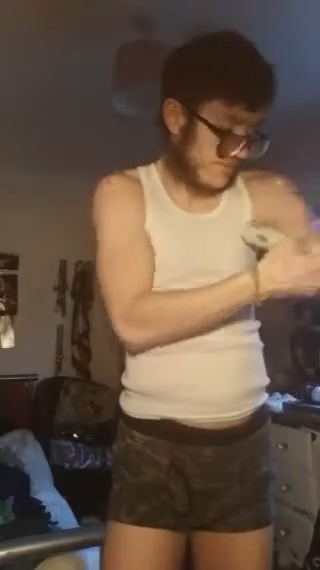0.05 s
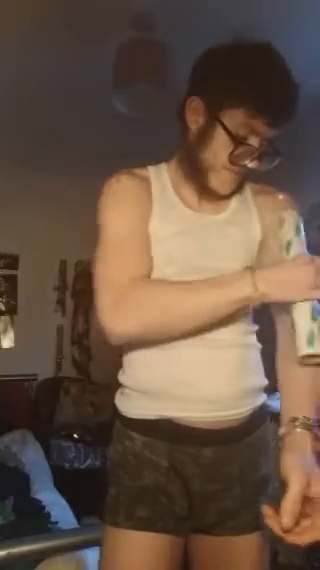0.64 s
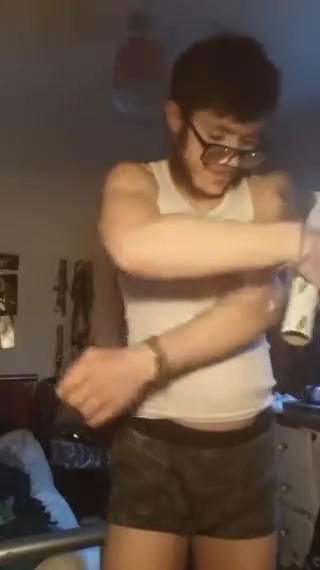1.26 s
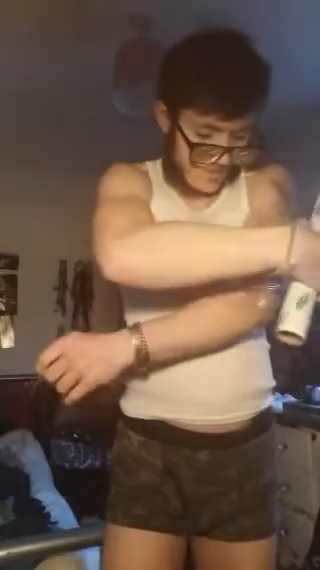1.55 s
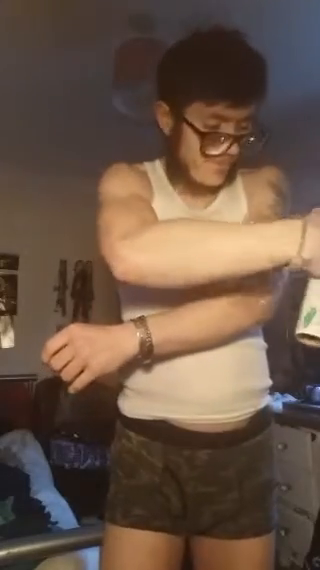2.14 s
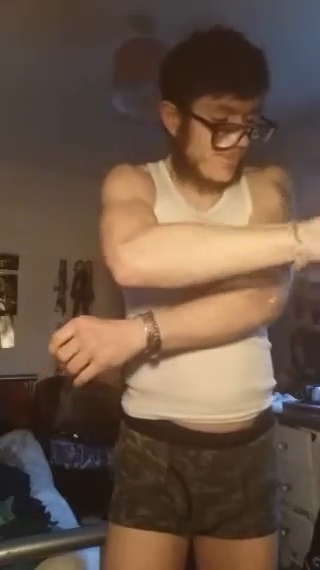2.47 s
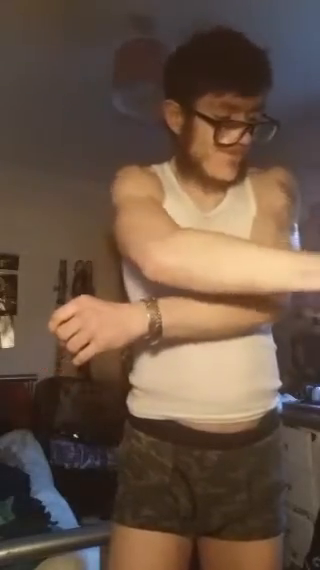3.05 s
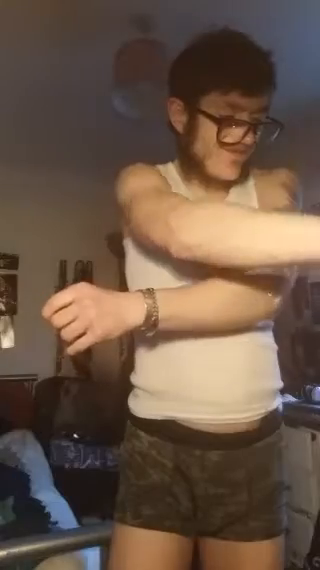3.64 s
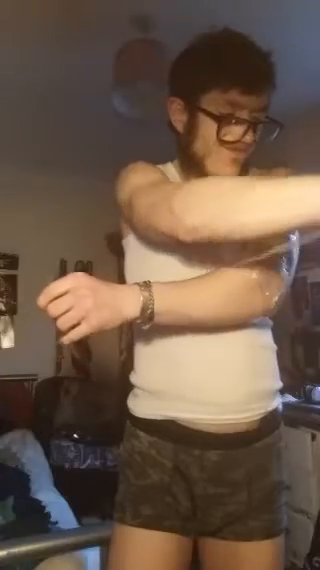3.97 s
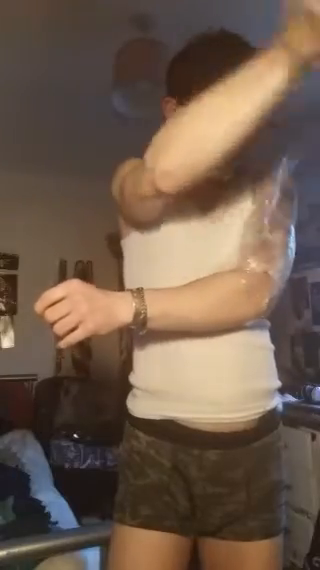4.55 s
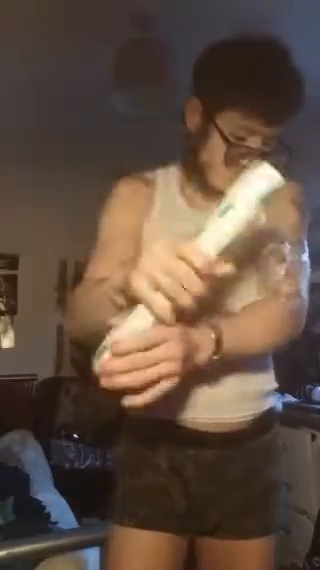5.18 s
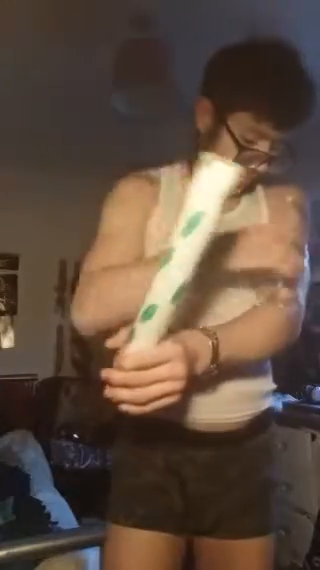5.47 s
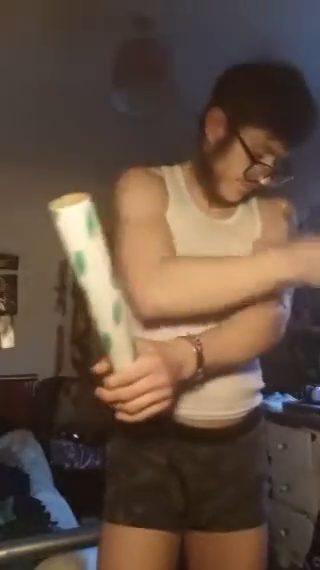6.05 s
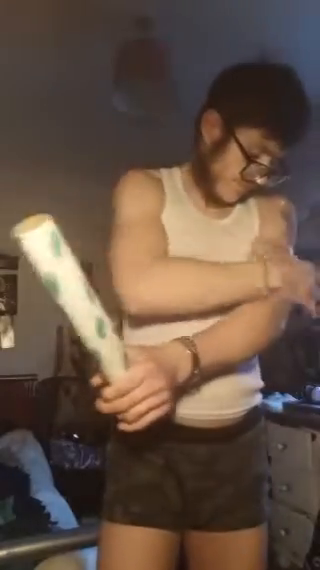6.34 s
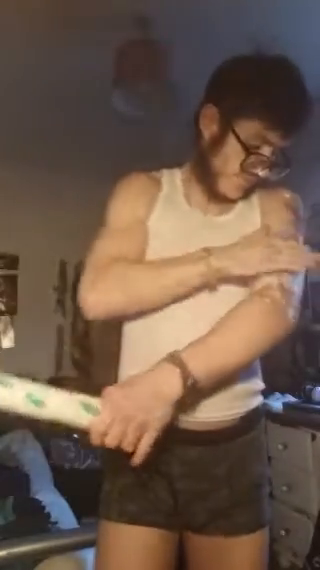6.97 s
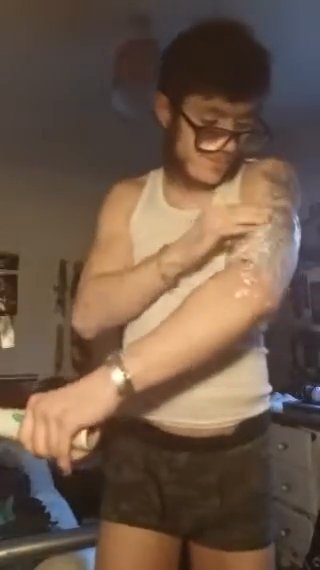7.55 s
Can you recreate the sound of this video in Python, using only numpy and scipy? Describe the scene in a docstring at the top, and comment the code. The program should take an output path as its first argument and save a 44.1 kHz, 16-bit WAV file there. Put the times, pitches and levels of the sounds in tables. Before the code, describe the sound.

Cling film peels off a cardboard roll and crinkles unevenly as it is wound around an arm, with small snaps, squeaks and light clinks of metal wrist jewellery. Partway through, the film rips once, loudly, with a soft puff of air. The crackling swells and eases, the roll bumps dully, and a palm smooths the film with two soft pats. It sounds close, in a small room with a faint hum.

```python
"""Cling film is wound round an arm in a small bedroom. First it peels off its cardboard roll by stick-slip
while metal wrist jewellery clinks and pings. As it goes on, its creases buckle in a steady crinkle, it
snaps and squeaks, and the roll rubs and bumps. At 3.2 s the taut film falls still, then rips once, loudly,
with a waft of air. The winding swells and eases, the jewellery rings again, and from about 6.4 s a palm
smooths the film down, with a dull tap and two soft pats. Short echoes and a faint hum lie under it all."""
import sys
import numpy as np
from scipy import signal
from scipy.fft import rfft, irfft
from scipy.io import wavfile
from scipy.ndimage import uniform_filter1d

SR = 44100
rng = np.random.default_rng(int(sys.argv[2]) if len(sys.argv) > 2 else 0)


def inscribe(sig):
    """Save sig as 16-bit PCM at rate SR to the path in sys.argv[1].

    A 1-D sig is mono; a 2-D sig holds one channel per row.
    Samples are clipped to [-1, 1] before scaling.
    """
    pcm = np.round(np.clip(np.atleast_2d(sig).T, -1, 1) * 32767)
    wavfile.write(sys.argv[1], SR, pcm.astype(np.int16))


N = 344421
TIME = np.arange(N) / SR
SILENT_DB = -120.
TEN_MS_GAIN = np.sqrt(SR / 100)   # gives a unit-energy sound the energy of 10 ms at unit rms


# radiation spectra of the film's crackle, treble fizz and low body: frequency_hz, relative_db
CRACKLE_SPECTRUM = [(300, -40.5), (900, -8.5), (1250, -14), (1600, -4), (2600, -2), (4000, -2), (5900, -3),
                    (6600, -10.5), (7600, -24.5), (12000, -51.5)]
FIZZ_SPECTRUM = [(3000, -35), (6500, -1.5), (8000, -8), (10000, -4), (13000, -3), (15200, 1), (16500, 0)]
BODY_SPECTRUM = [(30, -36.5), (80, -26.5), (160, -4.5), (270, -5.5), (500, -3), (660, -3), (920, 2.5),
                 (1200, -4), (1700, -9), (4000, -58)]
def crinkle(level_db, creases_per_s, patch_count=10):
    """Buckling: creases flip, each ringing a patch of its own size over sliding hiss; (crackle, fizz)."""
    creases = evened(clicks(creases_per_s, spread_db=7), 0.082)
    patch = rng.integers(0, patch_count, N)
    ringing = sum(resonate(creases * (patch == k), hz, .45 * hz) / np.sqrt(hz)
                  for k, hz in enumerate(np.geomspace(1100, 7500, patch_count)))
    hiss = from_db(-7) * rng.standard_normal(N)
    crackle = rms_one(evened(ringing, 0.054) + hiss) * from_db(level_db - 6)
    fizz_db = -58 + .85 * (level_db + 50)   # grows more slowly: loud movements use broader, duller patches
    fizz = rms_one(creases + hiss) * from_db(fizz_db)
    return colour(crackle, CRACKLE_SPECTRUM), colour(fizz, FIZZ_SPECTRUM)


# steady crinkling, rising with the tension of the film: time_s, level_db
WINDING_LEVELS = [(0.0, -51.5), (0.14, -54), (0.28, -55), (0.41, -65), (0.62, -65), (1.29, -64),
                  (1.55, -67), (2.43, -68.5), (2.5, -64.5), (2.81, -58.5), (2.93, -55), (3.16, -51.5),
                  (3.38, -52.5), (3.8, -50.5), (4.11, -47), (4.23, -46.5), (4.59, -56.5), (4.75, -67.5),
                  (5.51, -67), (5.65, -57.5), (5.77, -56), (5.82, -51.5), (5.96, -70), (6.2, -77)]
# dull rubbing of roll and film on the arm: time_s, level_db
RUB_LEVELS = [(0.0, -61.5), (0.26, -53.5), (0.41, -70), (1.09, -68.5), (1.23, -65.5), (1.8, -65.5),
              (1.95, -70.5), (2.81, -72), (3.19, -70.5), (3.87, -60), (4.23, -55.5), (4.56, -62.5),
              (4.66, -70.5), (5.56, -73.5), (5.75, -68), (6.2, -74)]
# spectrum of that rubbing: frequency_hz, relative_db
RUB_SPECTRUM = [(50, -26), (150, -15.5), (320, 5), (520, 1), (720, -0.5), (950, -1.5), (1250, -7.5),
                (2000, -18.5), (5000, -51)]
RIP_S = 3.213
def winding(creases_per_s=1300, clumps_per_s=45, ticks_per_s=50, still_s=.05):
    """Buckling and friction: the film crinkles in clumps, ticks and rubs as it goes on under tension."""
    clumps = np.interp(TIME * clumps_per_s, np.arange(N), rng.standard_normal(N))
    still = (TIME > RIP_S - still_s) & (TIME < RIP_S)   # the taut film holds just before it tears
    level_db = in_time(WINDING_LEVELS) - 2 + 2.5 * clumps - 12 * still
    crackle, fizz = crinkle(level_db, creases_per_s)
    impulses = clicks(ticks_per_s, spread_db=0.7) * from_db(level_db + 2)
    ticks = colour(impulses, CRACKLE_SPECTRUM) + from_db(4) * colour(impulses, FIZZ_SPECTRUM)
    rub = friction(in_time(RUB_LEVELS), creases_per_s, RUB_SPECTRUM)
    return crackle + fizz + rub + ticks


def rip(length_s=0.03, decay_db_per_s=400, creases_per_s=4000):
    """Fracture: a tear crosses the sheet as a dense avalanche of creases, then dies away."""
    level_db = -23 - decay_db_per_s * np.clip(TIME - RIP_S - length_s, 0, 1)
    level_db = np.where(TIME < RIP_S, SILENT_DB, level_db)
    crackle, fizz = crinkle(level_db, creases_per_s)
    return crackle + from_db(-7) * fizz + friction(level_db - 8.5, creases_per_s, BODY_SPECTRUM)


# snaps of the film, plus a dull tap (6.63 s) and two soft pats (7.0 and 7.31 s):
# start_s, level_db, relative_body_db, relative_fizz_db, duration_s
SNAPS_AND_PATS = [(0.17, -46, -8, -21, 0.0026), (0.185, -38.5, -17, -13.5, 0.0025),
                  (0.234, -45, -6, -9, 0.0029), (.246, -47.5, -16, -3, .0014),
                  (0.27, -42, -33, -6.5, 0.00095), (.281, -38.5, -17, -8.5, .0055),
                  (0.375, -47, -14, -7, 0.0034), (0.399, -39, -27.5, -13, 0.0015),
                  (0.406, -43.5, -30, -10, 0.00097), (.579, -48.5, -9, -12, 0.0012),
                  (.585, -42, -16, -4.5, .006), (1.77, -46, -14, -14, 0.0031), (1.888, -51, -9, -5, 0.0031),
                  (2.447, -50.5, -4.5, -7, 0.0025), (2.503, -56, -10, -6.5, 0.0012),
                  (2.58, -56, -12, -5, 0.0024), (2.822, -52.5, -11, -9, 0.0015),
                  (3.2102, -20, -4, -19, .0014), (3.2161, -21, -16, -24, 0.00073),
                  (3.2179, -22.5, -10, -21, 0.0013), (3.39, -51, -5.5, -7, 0.0015),
                  (3.422, -49, -18, -18, 0.0013), (3.459, -50, -8.5, -6.5, 0.0013),
                  (3.549, -46, -9, -7, .0018), (3.554, -40.5, -9.5, -18, .0014),
                  (3.672, -39, -5.5, -7.5, 0.0045), (3.817, -45.5, -14, -16, 0.009),
                  (3.888, -45, -8, -4.5, 0.0017), (4.067, -44.5, -11, -15, .0055),
                  (4.133, -32, -7.5, -30, 0.00089), (4.273, -45, -6, -37, 0.0027),
                  (4.316, -46.5, -1, -10, 0.0019), (4.361, -32.5, -6, -9, .0024),
                  (4.509, -55, -11, -4.5, 0.0015), (4.639, -29.5, -6, -12.5, .0029),
                  (5.275, -50, -6, -16, 0.0066), (5.666, -37, -6, -12.5, 0.0022),
                  (5.807, -57, -10, -16, 0.0012), (6.631, -64, 11, -20, 0.0021),
                  (7.003, -46.5, -6.5, -15, .0097), (7.31, -39.5, -11.5, -15, 0.0087),
                  (7.632, -66.5, -14, -11, .002)]
def snaps_and_pats(centre_hz=1740, body_db_per_octave=17, size=4096):
    """Impulsive excitation: in each snap, tap or pat, cracks swell round a main one and ring the film."""
    out, t = np.zeros(N), TIME[:size]
    low_cut = signal.butter(2, 420, "high", fs=SR, output="sos")   # a small patch radiates little bass
    for start_s, level_db, body_db, fizz_db, duration_s in SNAPS_AND_PATS:
        rise_s = .55 * duration_s
        ring_hz = centre_hz * 2 ** (-body_db / body_db_per_octave)   # less body, higher ring
        burst = flat_burst(t * np.exp(-t / rise_s), ragged_db=5)
        burst[int(rise_s * SR / 2)] += np.sqrt(0.00095 / duration_s)   # a quick snap is more one crack
        ring = resonate(burst, ring_hz, width_hz=1200)
        crack = unit_energy(colour(burst + ring, CRACKLE_SPECTRUM))
        body = from_db(body_db) * unit_energy(signal.sosfilt(low_cut, colour(burst, BODY_SPECTRUM)))
        fizz = from_db(fizz_db + 4) * unit_energy(colour(burst, FIZZ_SPECTRUM))
        add(out, start_s, from_db(level_db + 1) * TEN_MS_GAIN * (crack + body + fizz))
    return out


# tugs that crumple the film: start_s, length_s, first_db, last_db, relative_body_db
HAND_TUGS = [(.19, 0.14, -40.5, -47, -16), (.32, .1, -58, -50.5, -9), (.587, 0.065, -50, -48, -9.5),
             (.67, 0.05, -54, -53.5, -4), (.845, 0.084, -56, -65, -16), (1.75, 0.16, -61.5, -58, -4),
             (2.05, 0.23, -60.5, -60.5, -12), (2.4, 0.06, -57.5, -53.5, -13),
             (2.96, 0.17, -54.5, -53.5, -13.5), (5.183, 0.048, -50.5, -60, -19),
             (5.61, 0.062, -57.5, -42.5, -10), (5.672, 0.044, -51, -49.5, -13),
             (5.91, 0.022, -41.5, -46.5, -18), (6.668, 0.015, -54, -49.5, -21)]
# slides of film on skin and palm on film: start_s, length_s, first_db, last_db, relative_body_db
HAND_SLIDES = [(1.06, 0.34, -63.5, -62.5, 1.5), (4.133, 0.037, -35.5, -36.5, -1),
               (4.286, 0.019, -42.5, -41.5, 1.5), (6.355, 0.17, -48.5, -55.5, -12),
               (6.525, 0.12, -57, -67, -22.5), (7.025, .05, -58, -60, -14)]
def hands():
    """Forced buckling and sliding friction: tugs crumple; finer-grained slides swish in one resonance."""
    tugs = strokes(HAND_TUGS, attack_s=0.027, creases_per_s=2000, fizz_db=-0.5)
    slides = from_db(-3) * strokes(HAND_SLIDES, attack_s=0.041, creases_per_s=7000, fizz_db=-1.5)
    swish = from_db(-2) * resonate(slides, hz=2750, width_hz=1300)
    return tugs + slides + swish


def strokes(rows, attack_s, creases_per_s, fizz_db, release_s=0.044, fade_db=31.5):
    """Amplitude envelopes: each hand movement swells, runs on and fades; the whole sheet adds body."""
    level_db, body_db = np.full((2, N), SILENT_DB)
    for start_s, length_s, first_db, last_db, relative_body_db in rows:
        corners_s = [start_s - attack_s, start_s, start_s + length_s, start_s + length_s + release_s]
        corners_db = [first_db - fade_db, first_db, last_db, last_db - fade_db]
        during = (TIME > corners_s[0]) & (TIME < corners_s[-1])
        stroke_db = np.interp(TIME[during], corners_s, corners_db)
        level_db[during] = np.maximum(level_db[during], stroke_db)
        body_db[during] = np.maximum(body_db[during], stroke_db + relative_body_db)
    crackle, fizz = crinkle(level_db, creases_per_s)
    return crackle + from_db(fizz_db) * fizz + friction(body_db, creases_per_s, BODY_SPECTRUM)


def friction(level_db, catches_per_s, spectrum):
    """Sliding friction: filtered noise with small catches in it."""
    noise = rng.standard_normal(N)
    catches = from_db(-3) * evened(clicks(catches_per_s, spread_db=6), 0.062)
    return colour(rms_one(noise + catches) * from_db(level_db), spectrum)


# pulls off the roll: start_s, length_s, level_db, pitch_hz, upper_modes_db, slips_per_s
PEEL_PULLS = [(-.04, 0.33, -53, 2080, -13, 900), (0.618, 0.037, -43.5, 1915, -1.5, 900),
              (3.415, 0.089, -50.5, 1910, -4, 150), (3.56, 0.37, -70, 1920, -15, 120)]
# resonances of the taut sheet: pitch_ratio, width_hz, gain_db
SHEET_MODES = [(1.0, 129, 8.5), (1.25, 320, 0), (1.7, 170, 10), (2.05, 220, -28)]
def peeling(edge_s=0.0025):
    """Stick-slip: the film leaves the roll in small slips that pluck the taut sheet."""
    out = np.zeros(N)
    for start_s, length_s, level_db, pitch_hz, upper_db, slips_per_s in PEEL_PULLS:
        during = (TIME >= start_s) & (TIME <= start_s + length_s)
        slips = evened(clicks(slips_per_s, spread_db=4)[during], .015)
        sheet = sum(from_db(gain_db + upper_db * (k > 1)) * resonate(slips, ratio * pitch_hz, width_hz)
                    for k, (ratio, width_hz, gain_db) in enumerate(SHEET_MODES))
        to_edge_s = np.minimum(TIME[during] - start_s, start_s + length_s - TIME[during])
        out[during] += rms_one(sheet) * from_db(level_db) * np.minimum(to_edge_s / edge_s, 1)
    return out


# brief high jewellery pings (near 6.2 kHz) and lower squeaks of film: start_s, level_db, pitch_hz
PINGS_AND_SQUEAKS = [(.8525, -41, 6200), (0.88, -38, 6170), (1.4264, -36, 6300), (1.427, -41, 2820),
                     (1.5613, -38.5, 2820), (1.5772, -34.5, 2950)]
def pings_and_squeaks(fall_per_s=18, rise_s=0.00032, size=1024):
    """Damped oscillation: each ping or squeak is one brief tone whose pitch falls slightly."""
    out, t = np.zeros(N), TIME[:size]
    envelope = t / rise_s * np.exp(1 - t / rise_s)
    for start_s, level_db, pitch_hz in PINGS_AND_SQUEAKS:
        phase = 2 * np.pi * np.cumsum(pitch_hz * np.exp(-fall_per_s * t)) / SR
        add(out, start_s, from_db(level_db) * envelope * np.sin(phase))
    return out


# clinks as the arms swing: start_s, level_db, highest_modes_db
JEWELLERY_CLINKS = [(0.012, -69, -2), (0.031, -55, -4), (0.0547, -46, 11), (0.0876, -47, -9),
                    (4.73, -51, -17), (4.744, -49.5, -18.5), (4.91, -51, -8.5), (4.917, -54, -12),
                    (4.956, -55, 5), (4.969, -48.5, 0.5), (5.208, -46.5, 6), (5.218, -45.5, 12),
                    (5.261, -51, 1), (5.437, -59.5, 8), (5.807, -53.5, 16), (6.348, -56.5, 26)]
# modes of the metal links: frequency_hz, gain_db, t60_s
JEWELLERY_MODES = [(2450, -7, 0.043), (4900, -9, 0.033), (6130, 0.5, 0.038), (7900, -11, .025),
                   (9650, -10.5, 0.071), (10460, -11, 0.04), (12300, -4, 0.041), (13730, -4, 0.036),
                   (14750, -3, .02), (15480, -2, 0.036), (16900, -3, .02)]
def jewellery(scatter_db=6.5, highest_above_hz=14300, tick_s=0.002):
    """Modal ringing: links collide with a tick, exciting their modes in new proportions each time."""
    out, mode_hz = np.zeros(N), np.array(JEWELLERY_MODES)[:, 0]
    for start_s, level_db, highest_db in JEWELLERY_CLINKS:
        gains_db = highest_db * (mode_hz > highest_above_hz)
        gains_db = gains_db + scatter_db * rng.standard_normal(len(mode_hz))
        ring = unit_energy(struck(JEWELLERY_MODES, gains_db))
        contact = rng.standard_normal(len(ring)) * np.exp(-TIME[:len(ring)] / tick_s)
        tick = from_db(-3) * unit_energy(colour(contact, FIZZ_SPECTRUM))
        add(out, start_s, from_db(level_db - 1.5) * TEN_MS_GAIN * (ring + tick))
    return out


# knocks of the roll on hand and arm: start_s, level_db
ROLL_BUMPS = [(2.187, -34.5), (3.064, -52), (3.915, -42), (4.025, -62), (4.292, -47), (7.364, -52)]
# modes of the cardboard roll: frequency_hz, gain_db, t60_s
ROLL_MODES = [(155, -5, .065), (240, -9, .04), (305, 0, .062), (850, -18, .03)]
def bumps(contact_s=0.0046):
    """Soft impact: the yielding contact lets the modes of the cardboard roll swell in."""
    out, knock = np.zeros(N), struck(ROLL_MODES, np.zeros(len(ROLL_MODES)))
    swell = 1 - np.exp(-(TIME[:len(knock)] / contact_s) ** 2)
    for start_s, level_db in ROLL_BUMPS:
        add(out, start_s, from_db(level_db + 2) * knock * swell)
    return out


# air stirred by the swinging arm and flapping film: start_s, level_db, rise_s
AIR_WAFTS = [(3.21, -40, .036), (3.73, -63, 0.099), (4.31, -67, .05), (5.08, -65, .16)]
# spectrum of the moving air: frequency_hz, relative_db
AIR_SPECTRUM = [(15, -48), (35, -24), (56, -3), (72, -9), (100, -16.5), (170, -17), (400, -51.5)]
def wafts():
    """Pressure fluctuation: moving air arrives as a soft, deep flutter that swells and ebbs."""
    gust = np.zeros(N)
    for start_s, level_db, rise_s in AIR_WAFTS:
        age = np.maximum(TIME - start_s, 0) / rise_s
        gust += from_db(level_db) * (age * np.exp(1 - age)) ** 2
    return gust * evened(colour(rng.standard_normal(N), AIR_SPECTRUM), .06)


def echoes(x, early_t60_s=0.06, tail_t60_s=0.17, treble_t60_s=0.16, delay_s=0.0013, build_s=0.0042):
    """Reverberation: quick reflections off body and furniture, then a short diffuse tail."""
    size, hop = 8192, 1024
    t = np.maximum(TIME[:size] - delay_s, 0)
    padded, out = np.pad(x, size), np.zeros(N + 4 * size)
    fade = np.sqrt(signal.get_window("hann", 2 * hop))
    damping = signal.butter(2, 7000, fs=SR, output="sos")
    early_fall, tail_fall, treble_fall = (
        from_db(-60 * t / t60_s) for t60_s in (early_t60_s, tail_t60_s, treble_t60_s))
    for at in range(0, N + size, hop):   # the echo pattern changes as the arms move
        diffuse = rng.standard_normal(size)
        dull = signal.sosfiltfilt(damping, diffuse)   # soft furnishings absorb the treble sooner
        decay = dull * tail_fall + (diffuse - dull) * treble_fall
        tail = unit_energy(decay * (1 - np.exp(-t / build_s)))
        early = flat_burst((t > 0) * early_fall, ragged_db=0, passes=1)
        response = from_db(-7) * early + from_db(-6) * tail
        out[at:at + size + 2 * hop - 1] += signal.fftconvolve(padded[at:at + 2 * hop] * fade, response)
    return out[size:size + N]


# spectrum of the bedroom's background: frequency_hz, relative_db
ROOM_SPECTRUM = [(20, -21), (40, -7), (58, 0), (85, -1.5), (160, -1), (300, -12.5), (600, -19.5),
                 (1200, -18), (3000, -17.5), (6000, -26), (8000, -33), (15000, -29.5)]
def ambience(noise_db=-68, hum_db=-79, hum_hz=59):
    """Noise floor: faint broadband room noise with a low pure-tone hum."""
    hum = from_db(hum_db) * rms_one(np.sin(2 * np.pi * hum_hz * TIME))
    return from_db(noise_db) * colour(rng.standard_normal(N), ROOM_SPECTRUM) + hum


def clicks(per_s, spread_db):
    """Poisson process: random clicks of either sign, most small and a few large."""
    sizes = from_db(spread_db * np.minimum(rng.exponential(1, N), 4)) * rng.choice([-1, 1], N)
    return sizes * (rng.random(N) < per_s / SR)


def flat_burst(envelope, ragged_db, passes=3):
    """Spectral whitening: a swarm of cracks under an envelope, with no frequency favoured."""
    cracks, strength = rng.standard_normal((2, len(envelope)))
    burst = cracks * from_db(ragged_db * strength) * envelope
    gate = np.minimum(2 * envelope / envelope.max(), 1)
    for _ in range(passes):
        spectrum = rfft(burst)
        burst = irfft(spectrum / (np.abs(spectrum) + 1e-20)) * gate
    return unit_energy(burst)


def struck(modes, gains_db, size=6000):
    """Free vibration: one blow leaves a sum of exponentially decaying modes."""
    hz, db, t60_s = np.transpose(modes)[:, :, None]
    t = TIME[:size]
    return np.sum(from_db(db + gains_db[:, None] - 60 * t / t60_s) * np.sin(2 * np.pi * hz * t), axis=0)


def resonate(x, hz, width_hz):
    """Two-pole resonance with unit gain at its peak."""
    radius = np.exp(-np.pi * width_hz / SR)
    feedback = [1, -2 * radius * np.cos(2 * np.pi * hz / SR), radius ** 2]
    return signal.lfilter(np.array([1, 0, -1]) * (1 - radius ** 2) / 2, feedback, x + 1e-18)


def colour(x, spectrum, size=4096):
    """Minimum-phase filtering to a given spectrum; white input keeps its power."""
    hz, db = np.transpose(spectrum)
    grid_hz = np.maximum(np.arange(size // 2 + 1) * SR / size, 1)
    cepstrum = irfft(np.log(from_db(np.interp(np.log(grid_hz), np.log(hz), db))))
    response = irfft(np.exp(rfft(2 * cepstrum[:size // 2], size)))
    return signal.oaconvolve(x, unit_energy(response))[:len(x)]


def evened(x, span_s):
    """Running normalisation: power stays near one over a span, keeping the finer grain."""
    width = int(span_s * SR)
    power = uniform_filter1d(uniform_filter1d(x ** 2, width), width)
    return x / np.sqrt(np.maximum(power, 0) + 1e-3 * np.mean(x ** 2))


def from_db(db):
    """Decibels to amplitude ratio."""
    return 10 ** (np.asarray(db) / 20)


def rms_one(x):
    """Normalisation to unit rms."""
    return x / np.sqrt(np.mean(x ** 2) + 1e-20)


def unit_energy(x):
    """Normalisation to a unit sum of squares."""
    return x / np.sqrt(np.sum(x ** 2) + 1e-20)


def in_time(curve):
    """Linear interpolation of a curve at every sample."""
    return np.interp(TIME, *np.transpose(curve))


def add(out, start_s, sound):
    """Superposition of a short sound at a given time."""
    at = round(start_s * SR)
    out[at:at + len(sound)] += sound[:N - at]


def scene():
    """Direct and reflected sound: film fills the room, small sources less so, and the bumps stay dry."""
    film = winding() + hands() + rip() + snaps_and_pats() + peeling()
    small_sources = jewellery() + pings_and_squeaks()
    room = echoes(film + from_db(-1) * small_sources)
    return (film + small_sources + bumps() + room + wafts() + ambience())[None]


def record(dry, ceiling=0.93, cutoff_hz=15950):
    """Soft saturation rounds the highest peaks; a steep low-pass cuts the top treble."""
    rounded = dry / (1 + (dry / ceiling) ** 6) ** (1 / 6)
    return signal.sosfilt(signal.ellip(10, .1, 70, cutoff_hz, fs=SR, output="sos"), rounded)


dry = scene()
out = record(dry)
inscribe(out)
```